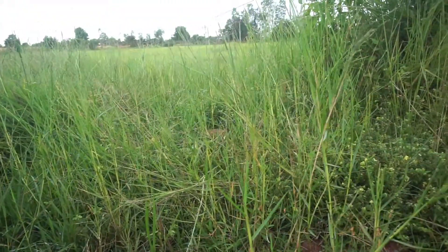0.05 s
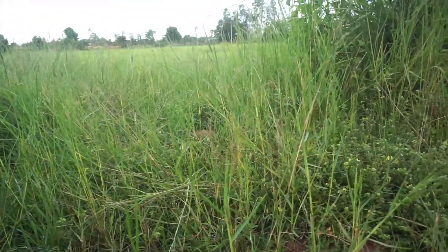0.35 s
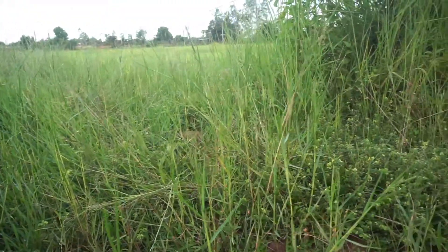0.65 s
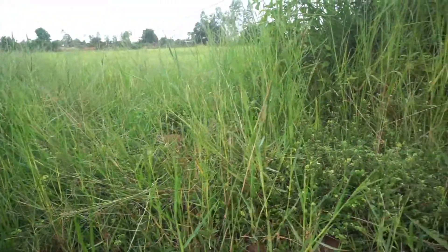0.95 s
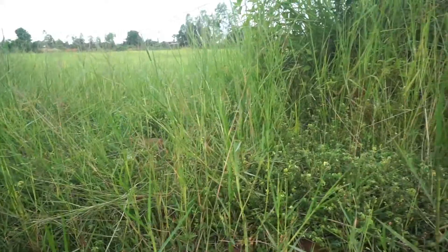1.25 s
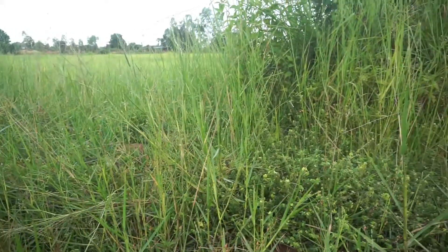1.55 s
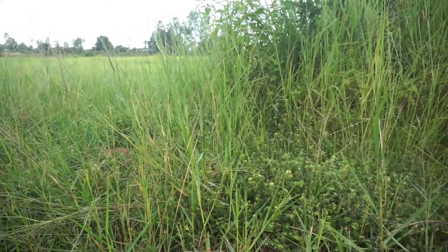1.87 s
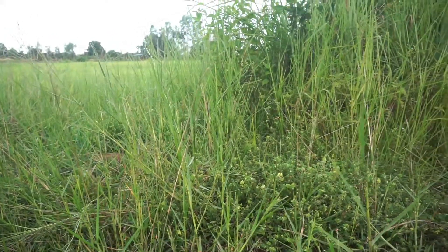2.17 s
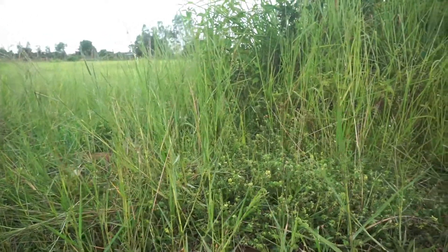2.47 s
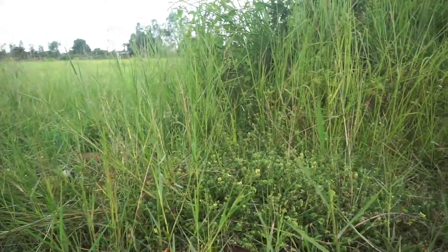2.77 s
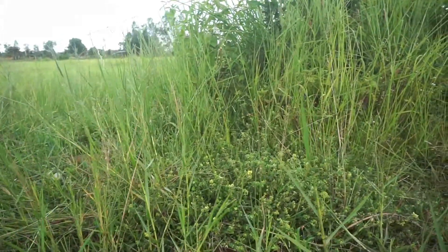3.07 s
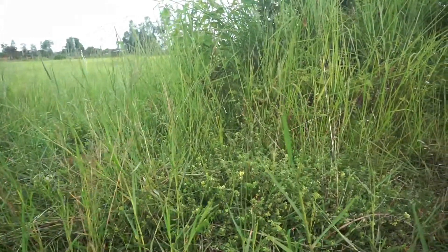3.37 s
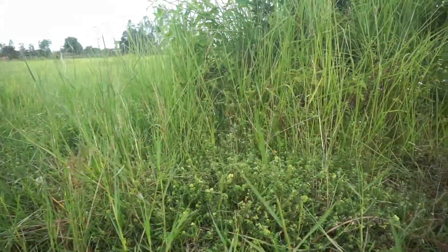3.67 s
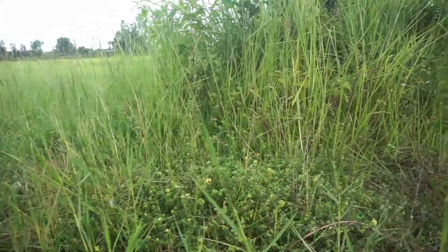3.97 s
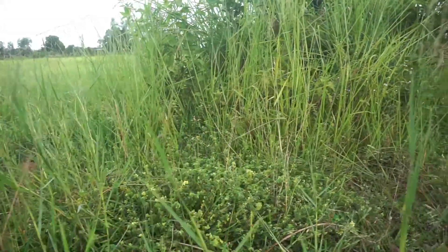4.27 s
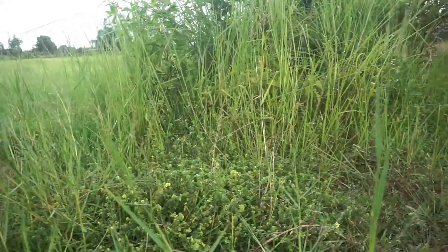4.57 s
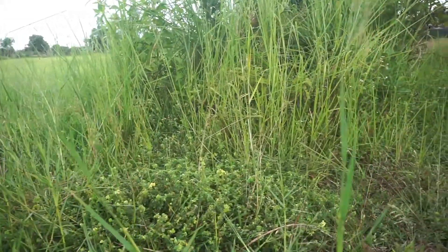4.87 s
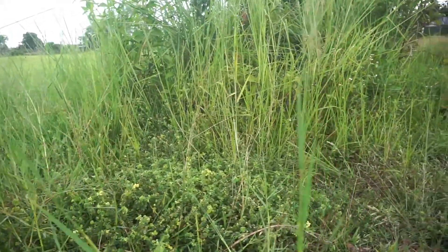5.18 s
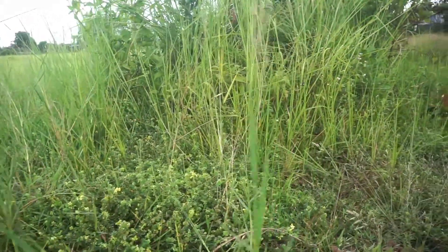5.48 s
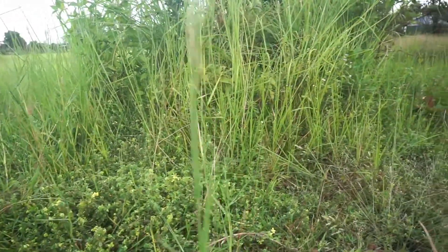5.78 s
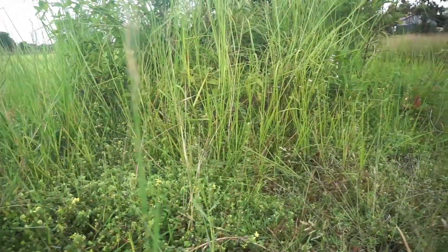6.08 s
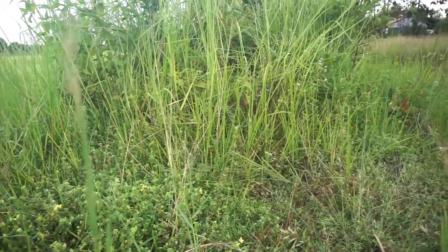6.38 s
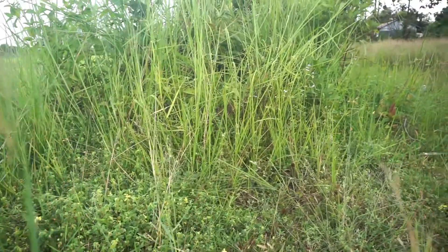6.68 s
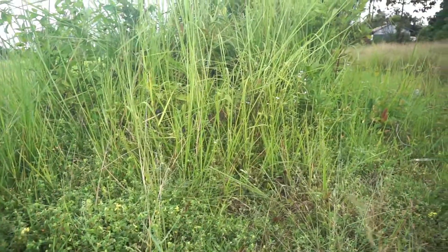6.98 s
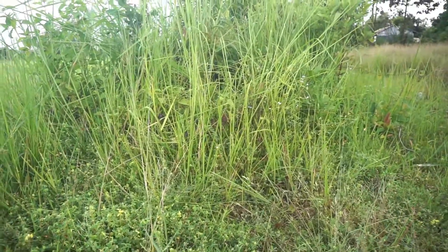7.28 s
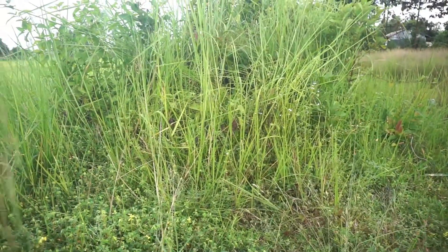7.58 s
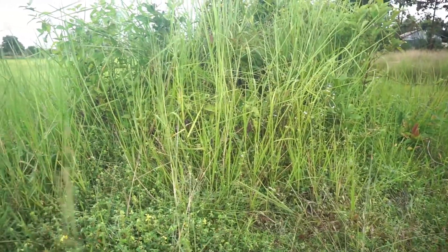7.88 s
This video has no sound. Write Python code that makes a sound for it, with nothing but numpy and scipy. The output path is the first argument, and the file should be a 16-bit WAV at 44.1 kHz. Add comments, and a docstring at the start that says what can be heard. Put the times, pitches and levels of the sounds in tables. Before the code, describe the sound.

Small birds call in short chirps from tall grass in an open field. Evenly spaced cheeps and a single swish of grass come first, followed by a quick, scratchy quarrel, then scattered trills and nasal calls. A cricket's thin buzz keeps starting and stopping, and a fainter one joins in. Gentle wind rumbles over a far hum, all heard through a hand-held camera with its own faint throb and whine.

```python
"""Small birds in tall grass

Birds cheep, chatter and scold at the edge of a field: their voice boxes send out quick pulses that
make their throats ring. A bush cricket rubs its wings in buzzing phrases, and a fainter one joins in.
Low wind and a distant drone lie underneath, and the grass swishes once. The hand-held camera that
hears it all adds a low throb and a thin whine that pulses with its frame rate."""
import sys
import numpy as np
from scipy import signal
from scipy.fft import rfft, irfft, next_fast_len
from scipy.io import wavfile
from scipy.ndimage import map_coordinates

SR = 44100
rng = np.random.default_rng(int(sys.argv[2]) if len(sys.argv) > 2 else 0)


def transcribe(signal):
    """Save signal, clipped to [-1, 1], as a 16-bit WAV file at the path in sys.argv[1]."""
    frames = np.atleast_2d(signal).T
    limited = np.clip(frames, -1, 1)
    pcm = np.round(limited * 32767).astype(np.int16)
    wavfile.write(sys.argv[1], SR, pcm)


N = 354563

# How strong each noise is from low to high: (frequency [Hz], relative level [dB])
WIND_SPECTRUM = [(15, -28), (30, -12), (45, -1), (68, -1.5), (100, -4), (150, -9), (250, -18.5), (600, -62),
                 (2000, -100)]
DRONE_SPECTRUM = [(50, -18), (130, -2), (250, 5), (340, 1.5), (480, -8.5), (650, -14.5), (1000, -29.5),
                  (3000, -98)]
FIELD_SPECTRUM = [(300, 4.5), (1000, 2), (1700, 2.5), (2400, -0.5), (3000, 2), (4500, -3), (6500, -5.5),
                  (7700, -5), (8700, -7), (9600, -6.5), (12000, -4.5), (15500, -12)]
GRASS_SPECTRUM = [(200, 9), (700, -1), (1400, 5.5), (2300, 4.5), (3500, -3.5), (6000, -11), (10000, -15),
                  (15500, -15)]
# How loud the wind, the grass and the far cricket are: (time [s], level [dB])
WIND_LEVELS = [(0, -49), (.7, -50), (1.9, -52), (2.5, -49), (3.7, -50), (4.5, -50), (5.2, -52.5),
               (6.3, -51), (7.1, -48.5), (8.04, -53)]
SWISH_LEVELS = [(1.68, -84), (1.82, -55.5), (1.95, -52), (2.06, -57), (2.2, -62), (2.7, -72), (3, -100)]
FAR_CRICKET_LEVELS = [(3.2, -100), (3.6, -77), (5.1, -78.5), (5.4, -100), (7.4, -100), (7.8, -77)]
# How loud the distant drone and its hum are: (time [s], drone level [dB], hum level [dB])
DRONE_LEVELS = [(0.0, -52.5, -54), (0.49, -53, -52.5), (5.93, -58, -57.5), (6.7, -57.5, -57),
                (8.04, -56.5, -87)]
# The tones in that hum: (pitch [Hz], relative level [dB])
HUM_TONES = [(224.3, -1), (477, -19)]
# The tone of the near cricket's wings: (time [s], pitch [Hz])
WING_PITCH = [(0, 11210), (3.9, 11210), (4.6, 11450), (7, 11260)]
# Its bursts of buzzing: (end time [s], length [s], level [dB])
CRICKET_PHRASES = [(.5, .7, -60.5), (1.233, .66, -64.5), (1.84, 0.52, -71), (2.58, .51, -71.5),
                   (3.28, 0.51, -71.5), (3.99, 0.49, -72), (4.809, 0.55, -69), (5.587, 0.53, -66.5),
                   (6.279, 0.51, -67), (7.03, 0.52, -63.5), (7.736, 0.6, -68), (8.45, 0.56, -69)]

# How a bird's throat rings: (multiple of the throat pitch, width [Hz], relative level [dB])
CHEEP_THROAT = [(1, 196, -9.5), (.8, 1130, -20), (1.15, 350, -19.5)]
WHINE_THROAT = [(0.993, 230, 4.5), (0.523, 220, -12), (1.72, 630, -6)]
TRILL_THROAT = [(0.98, 220, -6), (0.47, 400, -16)]
CHATTER_THROAT = [(1, 188, 3), (0.714, 1800, -8.5), (1.33, 620, -14)]
SCOLD_THROAT = [(1, 272, 5.5), (.53, 263, -12.5), (.64, 510, 0.5), (.85, 507, 3.5), (1.1, 425, -38),
                (1.85, 670, -11)]
# Bird notes: (time [s], length [s], level [dB])
CHEEPS = [(.99, 0.072, -44.5), (1.235, .07, -46.5), (1.461, 0.079, -46.5), (1.716, 0.074, -45.5),
          (1.957, 0.072, -44.5), (2.201, 0.084, -45.5)]  # clean and falling
WHINES = [(1.872, .02, -50.5), (6.817, .014, -53), (7.147, 0.037, -53), (7.389, .075, -50),
          (7.641, 0.083, -50), (7.884, 0.096, -49.5)]  # nasal, through a wide beak
CHATTER = [(0.377, 0.019, -51), (0.407, .037, -46), (0.664, 0.085, -54), (0.721, 0.019, -46.5),
           (0.76, 0.04, -45), (0.934, 0.015, -49), (3.274, 0.025, -43), (3.496, 0.019, -40),
           (3.588, 0.034, -46), (3.769, 0.029, -41), (3.814, 0.023, -44.5), (3.89, 0.064, -48.5),
           (4.037, .011, -42), (4.073, 0.019, -40), (4.142, 0.022, -39), (4.218, 0.011, -43.5),
           (4.367, .025, -41), (4.408, 0.031, -42), (4.428, 0.028, -40.5), (4.476, .038, -45),
           (4.535, 0.071, -50), (4.739, .066, -46.5), (4.924, 0.024, -44), (4.975, 0.026, -44),
           (5.01, 0.052, -45.5), (5.192, 0.023, -43), (5.246, 0.027, -48), (5.33, 0.036, -49.5),
           (5.379, 0.03, -52), (5.414, 0.073, -47.5), (5.592, 0.023, -44.5), (5.646, 0.0215, -46.5),
           (5.728, 0.045, -50), (5.784, 0.062, -48.5), (5.96, 0.023, -45.5), (6.18, 0.011, -49),
           (6.205, 0.044, -49.5), (7.043, 0.017, -45), (7.192, 0.02, -43.5)]  # raspy
SCOLDS = [(2.949, 0.01, -39), (2.973, 0.011, -42.5), (3.208, 0.013, -39), (3.441, 0.015, -45),
          (3.478, 0.014, -41), (3.522, .016, -40.5), (3.547, 0.017, -38), (3.561, 0.024, -38.5),
          (3.69, 0.018, -35.5), (3.757, 0.0051, -39.5), (3.784, .01, -39.5), (3.809, 0.0034, -36.5),
          (3.831, .0085, -39.5), (3.85, 0.019, -40), (3.862, 0.026, -38), (4.012, 0.014, -35),
          (4.091, .011, -37), (4.168, 0.028, -42), (4.184, .025, -37.5)]  # harsh, with the beak open
# Low, scratchy notes: (time [s], length [s], throat pitch [Hz], level [dB])
RASPS = [(0.383, .05, 2100, -62), (0.685, 0.031, 2280, -61), (3.951, 0.052, 2370, -57),
         (4.575, 0.05, 2030, -60), (7.094, 0.033, 2570, -63.5), (7.463, 0.11, 2690, -60)]
# Dry trills that speed up:
# (time [s], length [s], first pulse rate [Hz], last pulse rate [Hz], throat pitch [Hz], level [dB])
TRILLS = [(1.079, 0.099, 202, 220, 3130, -58), (6.084, .064, 90, 110, 2940, -59.5),
          (6.758, 0.18, 83.5, 153.3, 3240, -60), (6.948, 0.085, 172, 326, 3280, -55.5)]
# Short pips whose octave rings in the throat: (time [s], length [s], pitch [Hz], level [dB])
PIPS = [(.003, 0.0071, 1452, -44), (1.693, 0.0054, 1720, -36), (2.468, 0.013, 1446, -45),
        (6.375, 0.0085, 1465, -43), (7.319, .013, 1486, -43), (7.341, 0.0056, 1467, -41),
        (7.816, 0.0085, 1758, -51.5)]
# Thin squeaks that end a run of chatter: (time [s], pitch [Hz], level [dB])
SQUEAKS = [(0.461, 1576, -46), (5.463, 1480, -48), (5.825, 1467, -45)]
# Sliding whistles: (time [s], length [s], first pitch [Hz], last pitch [Hz], level [dB])
WHISTLES = [(0.18, 0.03, 2240, 2080, -61), (3.871, 0.01, 2055, 1820, -48), (4.198, 0.0076, 1940, 1810, -47),
            (4.421, 0.011, 1390, 1450, -46), (5.099, 0.047, 2020, 2340, -53.5),
            (5.2, .021, 1580, 1930, -52.5), (7.981, 0.024, 1660, 1550, -56)]
# The chattering bird tenses for the quarrel, then calms: (time [s], throat pitch [Hz], roughness [0-1])
TENSION = [(.4, 3165, 0.58), (.95, 3060, 0.42), (3.3, 3290, 0.49), (4.15, 3135, 0.35), (4.8, 3032, 0.28),
           (6.2, 2900, 0.38), (7.05, 3200, .27)]


def amp(db):
    """Turn decibels into a number to multiply by."""
    return 10 ** (np.asarray(db) / 20)


def unit(x):
    """Scale a sound to an average strength (rms) of 1."""
    return x / np.sqrt(np.mean(x ** 2) + 1e-20)


def curves(rows):
    """Join a table's points with straight lines: one curve for each column after the time."""
    times, *columns = np.transpose(rows)
    return [np.interp(np.arange(N) / SR, times, column) for column in columns]


def wobble(rate):
    """A smooth curve through `rate` random values a second."""
    return map_coordinates(rng.standard_normal(int(N * rate / SR) + 4), [np.arange(N) * rate / SR])


def filtered(x, response):
    """Turn each frequency in x up or down by response(hz)."""
    size = next_fast_len(N + 8192)
    return irfft(rfft(x, size) * response(np.fft.rfftfreq(size, 1 / SR)), size)[:N]


def noise(spectrum):
    """Noise of strength 1, shaped by (frequency [Hz], level [dB]) points."""
    points_hz, db = np.transpose(spectrum)
    white = rng.standard_normal(N)
    return unit(filtered(white, lambda hz: amp(np.interp(np.log(hz + 1), np.log(points_hz), db))))


def add(track, time, sound):
    """Mix a sound into the track at a time in seconds."""
    start = max(round(time * SR), 0)
    track[start:start + len(sound)] += sound[:N - start]


def camera(frame_hz=23.98):
    """The camera throbs at twice its frame rate and whines once a frame."""
    frames = np.arange(N) / SR * frame_hz
    throb = amp(-55 + 2.8 * wobble(3.1)) * np.sin(4 * np.pi * frames + 0.67 * wobble(6))
    offset = (frames % 1 - 0.5) / frame_hz  # seconds from the middle of the frame
    tones = np.sin(2 * np.pi * 12945 * offset) + amp(-5) * np.sin(2 * np.pi * 12710 * offset)
    whine = np.exp(-(offset / 0.005) ** 2) * tones
    return throb + amp(-81) * unit(whine)


def wind():
    """Wind rumbles in gentle gusts."""
    level_db, = curves(WIND_LEVELS)
    return amp(level_db + 1.2 * wobble(7)) * noise(WIND_SPECTRUM)


def distant_drone():
    """A far, motor-like drone with a wavering hum; it is brighter when it is louder."""
    t = np.arange(N) / SR
    drone_db, hum_db = curves(DRONE_LEVELS)
    drone = amp(drone_db) * noise(DRONE_SPECTRUM)
    whirr_db = drone_db.max() - 7.5 + 4.1 * (drone_db - drone_db.max())
    whirr = amp(whirr_db) * noise([(330, -35), (430, 7.5), (540, 4), (680, -41)])
    hum = np.zeros(N)
    for hz, db in HUM_TONES:
        strength = amp(hum_db + db + 1.46 * wobble(6))
        hum += strength * np.sqrt(2) * np.sin(2 * np.pi * hz * t + 0.49 * wobble(12))
    return drone + whirr + hum


def grass():
    """The field hisses evenly, and the grass swishes once."""
    swish_db, = curves(SWISH_LEVELS)
    hiss = amp(-62.5 + 0.04 * wobble(2.26)) * noise(FIELD_SPECTRUM)
    swish = amp(swish_db + 1.6 * wobble(39.83)) * noise(GRASS_SPECTRUM)
    return hiss + swish


def far_cricket():
    """A cricket so far away that its wing strokes blur into a thin, flickering hiss."""
    level_db, = curves(FAR_CRICKET_LEVELS)
    return amp(level_db + 1.9 * wobble(16)) * noise([(8400, -47), (9200, -1), (9700, 0), (10400, -35)])


def bush_cricket(stroke_hz=142.8, scrape_db=-3, swell_s=0.076, stop_s=0.0085):
    """Each wing stroke makes a falling tone and a scrape; a phrase swells, rises and stops dead."""
    t = np.arange(N) / SR
    strokes = np.cumsum(stroke_hz * (1 + 0.0035 * wobble(24))) / SR
    offset = (strokes % 1 - 0.5) / stroke_hz  # seconds from the middle of the stroke
    pulses = unit(np.exp(-(offset / 0.002) ** 2) + 0.085)
    scrape = noise([(9000, -46), (10000, -31), (10450, -16.5), (10900, -6),
                    (11250, -10), (11600, -9), (11950, -20), (13000, -46)])
    wing_hz = curves(WING_PITCH)[0] + 30 * wobble(3.2) + 80 * wobble(stroke_hz)  # no two strokes alike
    out = np.zeros(N)
    for end, length, db in CRICKET_PHRASES:
        start = end - length
        on = (t > start) & (t < end)
        effort = 1 - np.exp(-(t[on] - start + 0.029) / swell_s)
        stop = np.minimum((end - t[on]) / stop_s, 1)
        hz = wing_hz[on] - 200 * (1 - effort)
        chirp = np.sqrt(2) * np.sin(2 * np.pi * hz * offset[on] * (1 - 2 * offset[on]))
        out[on] += amp(db) * effort * stop * pulses[on] * (chirp + amp(scrape_db) * scrape[on])
    return out


def echoes(x, stems_db=-9, stems_s=0.1, trees_db=-16, trees_s=0.82):
    """Stems scatter the calls at once; the tree line answers later and softer."""
    t = np.arange(SR * 3 // 4) / SR
    stems, trees = rng.standard_normal((2, len(t)))
    stems *= amp(-60 * t / stems_s)
    trees *= amp(-60 * t / trees_s) * (1 - np.exp(-(t / 0.066) ** 2))
    tail = amp(stems_db) * stems / np.linalg.norm(stems) + amp(trees_db) * trees / np.linalg.norm(trees)
    return signal.fftconvolve(x, tail)[:N]


def small_body(x, low_hz=1460, high_hz=7200):
    """A small bird's body sends out only a narrow range of frequencies."""
    return filtered(x, lambda hz: (1 - 1 / (1 + (hz / low_hz) ** 16)) / (1 + (hz / high_hz) ** 8))


def pulsed_note(length, pulse_hz, throat_hz, rough, throat, rise_s, fade_db, accent_db=0):
    """Voice-box pulses make the throat ring; roughness scatters their timing, size and pitch."""
    t = np.arange(round((length + 0.008) * SR)) / SR
    glide = np.minimum(t / length, 1) ** 1.4  # the pitch holds, then slides
    cycles = np.cumsum(np.interp(glide, np.linspace(0, 1, len(pulse_hz)), pulse_hz)) / SR
    count = max(int(np.ceil(np.interp(length, t, cycles) - 0.3)), 1)
    late, louder, higher = rng.standard_normal((64, 3))[:count].T
    times = np.interp(np.arange(count) + 0.185 * rough * late, cycles, t)
    times[0] = 0  # the first pulse is prompt and firm
    sizes = amp(np.where(times > 0, 6.8 * rough * louder, accent_db) - fade_db * (times / length) ** 2)
    ring_hz = np.interp(np.interp(times, t, glide), np.linspace(0, 1, len(throat_hz)), throat_hz)
    ring_hz *= 1 + 0.092 * rough * higher
    age = np.maximum(t - times[:, None], 0)  # seconds since each pulse, one row per pulse
    rings = sum(amp(db) * np.exp(-np.pi * width * age) * np.sin(2 * np.pi * ratio * ring_hz[:, None] * age)
                for ratio, width, db in throat)
    sound = sizes @ (rings * (1 - np.exp(-age / rise_s)))
    return sound / np.sqrt(np.sum(sound ** 2) / (length * SR) + 1e-20)


def falling_note(length, hz, throat, pulse_hz, sag, rough, arch=0, accent_db=0):
    """Throat pitch and pulse rate drop together by the share `sag`; `arch` bends the middle."""
    bend = np.array([1 - arch / 2, 1 - sag / 2 + arch / 2, 1 - sag - arch / 2])
    return pulsed_note(length, pulse_hz * bend, hz * bend, rough, throat,
                       rise_s=0.00033, fade_db=6.5, accent_db=accent_db)


def sliding_tone(length, first_hz, last_hz, base_db=0, octave_db=0, rasp=0.087):
    """A slightly raspy sliding tone, with overtones at two and three times its pitch."""
    progress = np.linspace(0, 1, round((length + 0.006) * SR))
    flutter = map_coordinates(rng.standard_normal(128), [np.arange(len(progress)) * 900 / SR])
    phase = 2 * np.pi * np.cumsum(first_hz + (last_hz - first_hz) * progress) / SR + rasp * flutter
    overtones = np.sin(2 * phase) + amp(-26) * np.sin(3 * phase)
    wave = amp(base_db) * np.sin(phase) + amp(octave_db) * overtones
    return np.sqrt(2) * wave * signal.windows.tukey(len(wave), 0.5)


def clear_notes():
    """Pips that start with a snap, rising squeaks and raspy sliding whistles."""
    out = np.zeros(N)
    for time, length, hz, db in PIPS:
        pip = sliding_tone(length, 0.988 * hz, 1.012 * hz, base_db=-7)
        snap = pulsed_note(0.0087, [500], [2 * hz], 0.41, SCOLD_THROAT, rise_s=0.0001, fade_db=4)
        add(out, time - 0.001, amp(db) * pip)
        add(out, time, amp(db - 9) * snap)
    for time, hz, db in SQUEAKS:
        add(out, time, amp(db) * sliding_tone(0.022, 0.9655 * hz, 1.0345 * hz, base_db=-21))
    for time, length, first_hz, last_hz, db in WHISTLES:
        add(out, time, amp(db) * sliding_tone(length, first_hz, last_hz, octave_db=-23, rasp=0.45))
    return out


def calls(cheep_hz=3080, whine_hz=3596):
    """Even pulses make clean cheeps and whines; uneven ones make rasps and dry trills."""
    out = np.zeros(N)
    for time, length, db in CHEEPS:
        cheep = falling_note(length, cheep_hz, CHEEP_THROAT,
                             pulse_hz=442, sag=0.1, rough=0.065, arch=0.014)
        add(out, time, amp(db) * cheep)
    for time, length, db in WHINES:
        whine = falling_note(length, whine_hz, WHINE_THROAT, pulse_hz=394, sag=0.0453, rough=0.065)
        add(out, time, amp(db) * whine)
    for time, length, hz, db in RASPS:
        rasp = falling_note(length, hz, CHATTER_THROAT, pulse_hz=404, sag=0.17, rough=0.77)
        add(out, time, amp(db) * rasp)
    for time, length, *pulse_hz, hz, db in TRILLS:
        trill = pulsed_note(length, pulse_hz, [hz], 0.31, TRILL_THROAT, rise_s=0.00073, fade_db=-2)
        add(out, time, amp(db) * trill)
    return out


def chatter():
    """Tension sets each note's pitch and roughness; a tighter throat also pulses faster."""
    out = np.zeros(N)
    throat_hz, roughness = curves(TENSION)
    for time, length, db in CHATTER:
        now = round(time * SR)
        higher, arch = rng.standard_normal(2)  # each note turns its own way
        hz = throat_hz[now] * (1 + 0.012 * higher)
        note = falling_note(length, hz, CHATTER_THROAT, pulse_hz=356.2 * (hz / 3000) ** 2.3,
                            sag=0.028, rough=roughness[now], arch=0.018 * arch, accent_db=-1)
        add(out, time, amp(db) * note)
    return out


def scolding(scold_hz=3400, scold_pulse_hz=426.1, stutter_hz=3560, stutter_pulse_hz=175.8):
    """Hard rattles start sharply and fade; a soft, even stutter leads into the quarrel."""
    out = np.zeros(N)
    stutter = [(3.312 + k * 0.034, 0.018, -47.5, stutter_hz, stutter_pulse_hz) for k in range(4)]
    scolds = [(*row, scold_hz, scold_pulse_hz) for row in SCOLDS]
    for time, length, db, hz, pulse_hz in stutter + scolds:
        tightness = 1 + 0.0138 * rng.standard_normal()
        rattle = pulsed_note(length, [pulse_hz * tightness ** 2.3], [hz * tightness],
                             rough=0.32, throat=SCOLD_THROAT, rise_s=0.00016, fade_db=9)
        add(out, time, amp(db) * rattle)
    return out


def scene():
    """The birds, their echoes, the crickets and the background meet at one microphone."""
    birds = small_body(calls() + chatter() + scolding() + clear_notes())
    animals = birds + echoes(birds) + bush_cricket() + far_cricket()
    background = wind() + distant_drone() + grass() + camera()
    return (animals + background)[None]


def record(dry):
    """The camera keeps nothing above its highest frequency."""
    top_hz = 15720
    return filtered(dry[0], lambda hz: hz < top_hz)[None]


dry = scene()
out = record(dry)
transcribe(out)
```